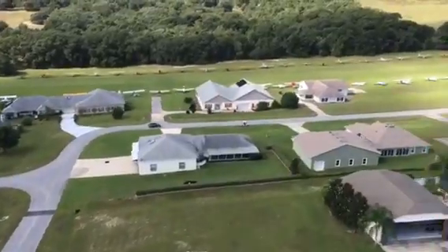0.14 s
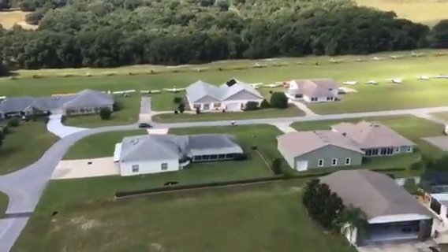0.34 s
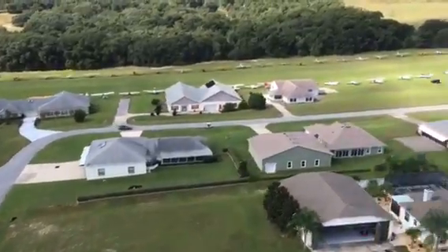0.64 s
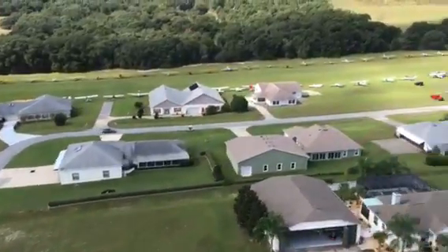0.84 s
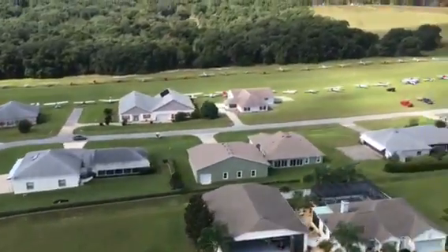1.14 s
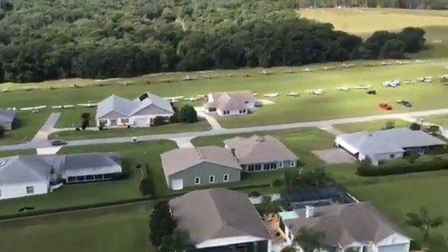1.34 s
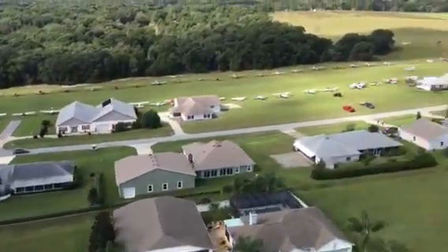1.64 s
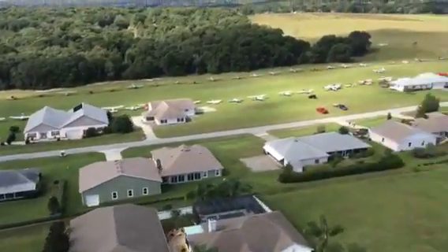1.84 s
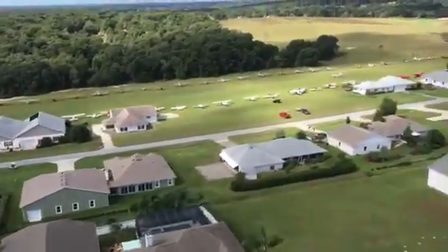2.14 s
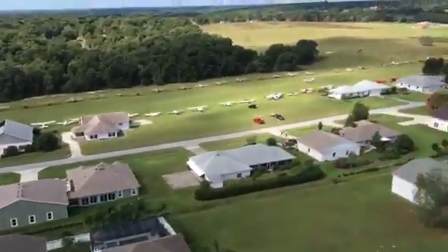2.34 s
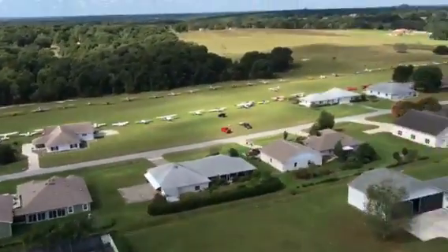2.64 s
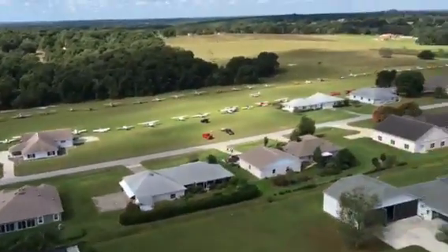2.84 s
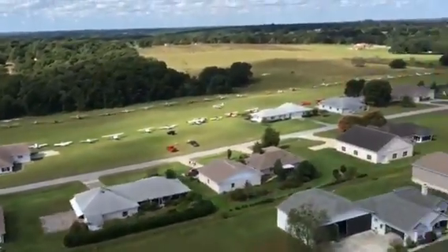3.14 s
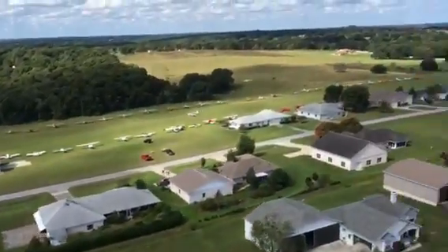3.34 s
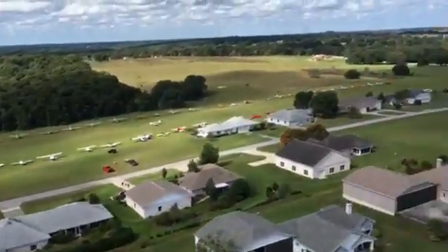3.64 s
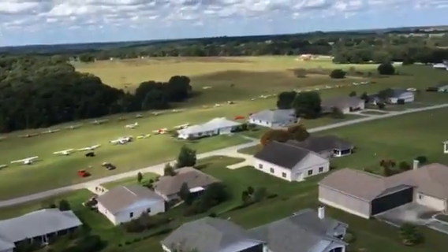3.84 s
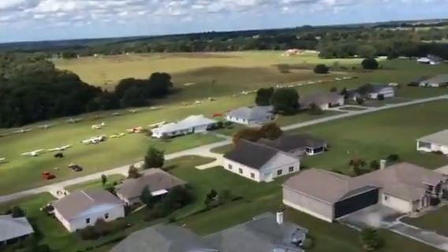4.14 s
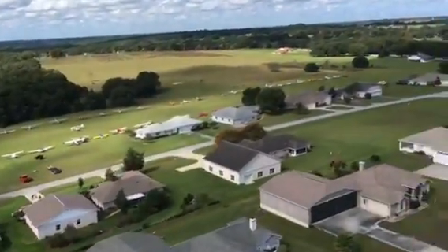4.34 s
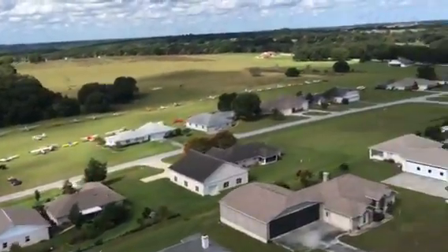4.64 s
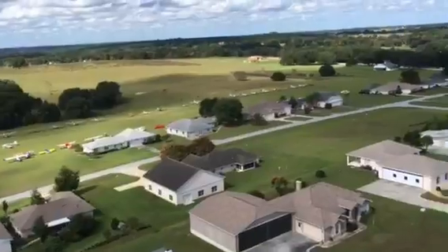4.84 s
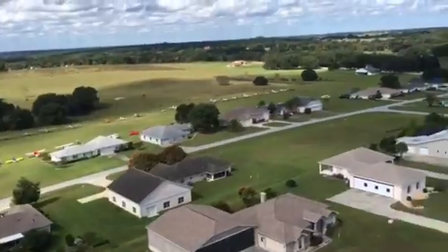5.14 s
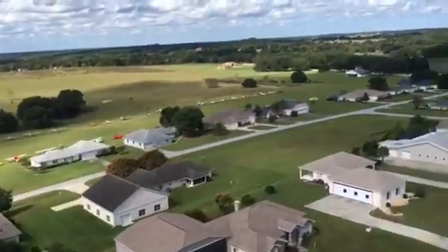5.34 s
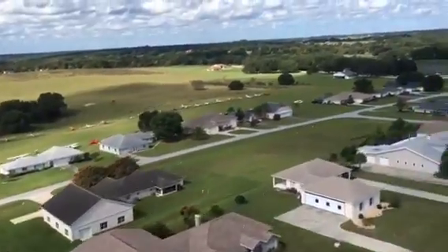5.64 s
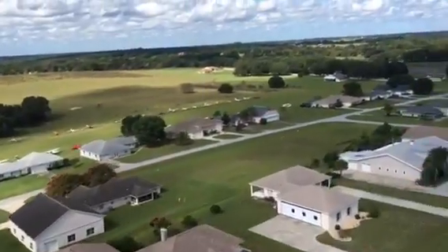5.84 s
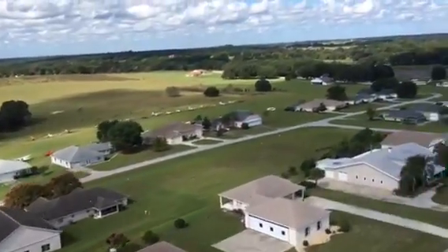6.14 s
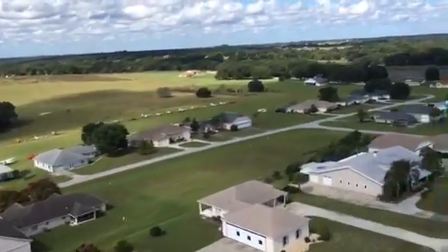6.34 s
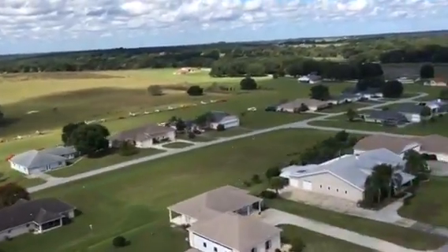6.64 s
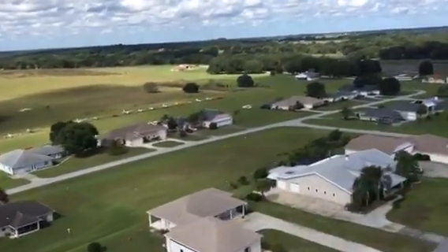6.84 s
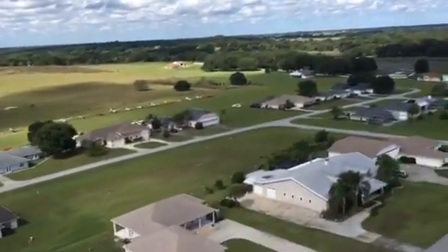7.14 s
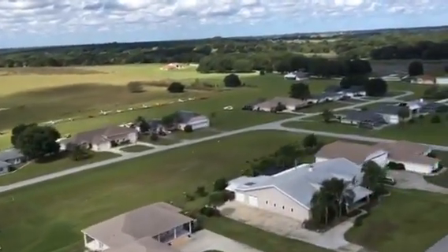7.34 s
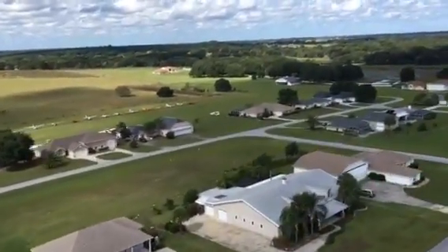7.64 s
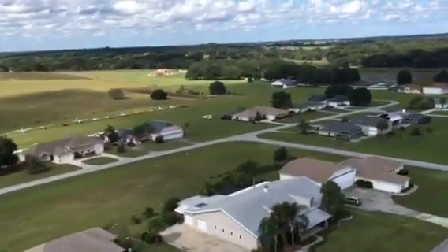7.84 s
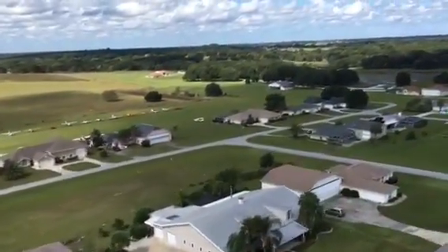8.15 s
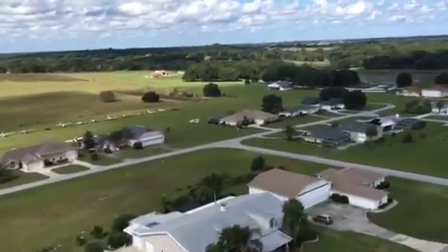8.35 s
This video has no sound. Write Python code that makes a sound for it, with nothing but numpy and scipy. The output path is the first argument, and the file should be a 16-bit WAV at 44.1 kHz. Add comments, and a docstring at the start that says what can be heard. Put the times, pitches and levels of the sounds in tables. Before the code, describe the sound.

Aboard a small open helicopter in steady flight, close and windy throughout. Rotor blades pass about 13.6 times a second, each a short sweep of bright hiss over broad rushing cabin air; this hiss swells most around 2 seconds and is slightly weaker later. Beneath, a six-cylinder piston engine holds a low, slightly wavering drone, locked to the rotor. From 0 to 3.5 seconds the wind is moderate: low lumpy buffeting, soft shoves and occasional thumps and pops. From about 3.7 crackling bursts come more often, getting brighter through 5. Around 5.2 to 6 the slipstream slams the microphone with heavy thumps, sharp cracks and a torn fluttering roar, squashed at the peaks. It dips near 6.5, surges again around 7.3, then eases with scattered thuds and crackles to 8.5, rotor and engine continuing unchanged.

```python
"""Small piston helicopter, open air

Air rushes around the cabin: shaped noise. Each rotor blade sweeps bands of hiss past, gated by its passage.
A six-cylinder engine drones beneath: sine lines geared to the rotor.
One slipstream, hardest after five seconds, shakes the microphone with narrow bands of low noise.
It crackles in short noise grains, roars and cracks; a limiter holds the peaks."""
import sys
import numpy as np
from scipy import signal
from scipy.fft import rfft, irfft, next_fast_len
from scipy.io import wavfile
from scipy.ndimage import uniform_filter1d, minimum_filter1d

SR = 44100
rng = np.random.default_rng(int(sys.argv[2]) if len(sys.argv) > 2 else 0)


def int16_out(signal):
    """Quantize to a 16-bit WAV file."""
    q = np.round(np.clip(np.atleast_2d(signal).T, -1, 1) * 32767)
    wavfile.write(sys.argv[1], SR, q.astype(np.int16))


N = 374850


def undb(db):
    """Decibels to gain."""
    return 10 ** (np.asarray(db) / 20)


def curve(table, column=1):
    """One column of a table, joined by straight lines in time."""
    rows = np.array(table, float)
    return np.interp(np.arange(N) / SR, rows[:, 0], rows[:, column])


def noise(gain):
    """Noise of rms 1 whose spectrum follows gain(Hz)."""
    size = next_fast_len(N)
    hz = np.maximum(np.arange(size // 2 + 1) * SR / size, 1)
    spectrum = rfft(rng.standard_normal(size)) * gain(hz)
    x = irfft(spectrum, size)[:N]
    return x / x.std()


def coloured(points):
    """Noise of rms 1 whose spectrum joins (Hz, dB) points."""
    hz, db = np.transpose(points)
    return noise(lambda f: undb(np.interp(np.log(f), np.log(hz), db)))


def walk(rate_hz):
    """Slow random drift of spread 1, about rate_hz turns a second."""
    return noise(lambda f: np.exp(-.5 * (f / rate_hz) ** 2))


def steadied(x, seconds):
    """Noise with its slow swells evened out, so that a curve can play its strength."""
    local_power = uniform_filter1d(x * x, max(int(seconds * SR), 2))
    return x / np.sqrt(local_power + 1e-9)


def swells(rate_hz, depth_db):
    """A gain that swells and sinks by chance, its power evened over 0.65 s."""
    return steadied(undb(depth_db * walk(rate_hz)), seconds=0.65)


def blade_gate(blades, delay, rise, fall):
    """A rounded swell, peaking delay seconds after each blade passage, with its own rise and fall."""
    period = N / SR / (blades[-1] - blades[0])
    since = (blades - delay / period) % 1 * period
    falling = np.exp(-.5 * (since / fall) ** 2)
    rising = np.exp(-.5 * ((period - since) / rise) ** 2)
    return np.maximum(falling, rising)


def bell(s, length, skew=.3):
    """Sample numbers and heights of a burst of power that rises faster than it falls."""
    length = max(abs(length), 2 / SR)
    first = max(int((s - 2 * length) * SR), 0)
    last = min(int((s + 3 * length) * SR), N)
    i = np.arange(first, last)
    u = (i / SR - s) / length
    side = 1 + np.clip(skew, 0, .7) * np.sign(u)
    return i, np.exp(-np.pi * (u / side) ** 2)


def power(times, db, lengths):
    """Power over time of a train of bursts."""
    out = np.zeros(N)
    for s, gain, length in zip(*np.broadcast_arrays(times, undb(db), lengths)):
        i, height = bell(s, length)
        out[i] += gain ** 2 * height
    return out


def grains(times, db, lengths, colour):
    """Short puffs of coloured noise, each with its own grain and a set strength."""
    source, out = coloured(colour), np.zeros(N)
    starts = rng.integers(0, N, len(times))
    for s, gain, length, start in zip(*np.broadcast_arrays(times, undb(db), lengths, starts)):
        i, height = bell(s, length)
        grain = source[(start + np.arange(len(i))) % N] * np.sqrt(height)
        # every grain carries the energy of its bell
        out[i] += gain * grain * np.sqrt(height.sum() / (grain @ grain + 1e-18))
    return out


# spectrum of the rush around the cabin: relative
# columns: pitch_hz, density_db (per Hz)
AIR_COLOUR = [(150, 2), (230, 3.5), (330, 5), (560, -12), (750, -7), (930, -4), (1500, -12.5), (2200, -13),
              (3500, -19), (6200, -25.5), (7800, -27), (9800, -26), (10500, -32), (11800, -26.5),
              (16000, -39)]


def air(level_db=-37, flicker_db=2.0):
    """Air rushes around the cabin: broad noise that flickers quickly."""
    return coloured(AIR_COLOUR) * undb(level_db + flicker_db * walk(32))


# blade swish, the highest band first; rise and fall are Gaussian spreads
# columns: centre_hz, width_hz, level_db (before scatter and hiss ride), delay_s, rise_s, fall_s
SWISH_BANDS = [(14200, 2000, -59.5, .018, .009, .015), (11420, 1460, -47, 0.0021, 0.0041, 0.0042),
               (8830, 2700, -48.5, 0.0067, 0.0083, 0.011), (6000, 2000, -55.5, 0.036, 0.025, 0.017),
               (4530, 860, -49, 0.006, 0.0079, .014), (1870, 1100, -46, 0.0054, 0.011, 0.016)]


def rotor_swish(blades, scatter_db=1.3):
    """Each blade sweeps bands of hiss past the cabin, each band with its own delay and linger."""
    out = 0
    for hz, width, db, delay, rise, fall in SWISH_BANDS:
        band = noise(lambda f: 1 / (1 + ((f * f - hz * hz) / (f * width)) ** 2 / 2))
        out = out + undb(db) * band * blade_gate(blades, delay, rise, fall)
    return out * undb(scatter_db * walk(1.4))


# ride on the air and blade hiss together
# columns: time_s, gain_db
HISS_RIDE = [(0, 2), (.8, 2.5), (2, 5.5), (2.8, 2.5), (3.7, 3.5), (4.5, -0.5), (5.5, 0.5), (6.3, -2),
             (8.5, -1.5)]


def hiss(blades):
    """Cabin air and blade swish rise and sink together."""
    return (rotor_swish(blades) + air()) * undb(curve(HISS_RIDE))


ENGINE_TURNS_PER_BLADE = 10 / 3
# engine lines; the engine fires three times a crankshaft turn
# columns: multiple (of the crankshaft rate), level_db (rms, before the waver)
ENGINE_LINES = [(1, -27.5), (1.5, -24), (2, -28), (3, -32), (6, -38.5), (7, -44), (9, -41.3), (19, -51.5),
                (19.5, -49.3)]


def engine(blades):
    """Crankshaft and firing lines, geared to the rotor; each wavers a little in the moving air."""
    angle = 2 * np.pi * blades * ENGINE_TURNS_PER_BLADE
    out = 0
    for multiple, db in ENGINE_LINES:
        order = np.round(2 * multiple) / 2  # a four-stroke cycle lasts two turns
        waver = .16 * np.sqrt(order) * walk(4)
        phase = order * angle + rng.uniform(0, 2 * np.pi) + waver
        out = out + np.sqrt(2) * undb(db + 1.5 * walk(2)) * np.sin(phase)
    return out


# eddies by size; the small ones grow fastest in a strong wind
# columns: centre_hz, level_db (at 0 dB of buffeting, before lumps and shoves), slope_db (per dB of buffeting)
EDDY_SIZES = [(47.7, -26, 0.37), (64.9, -17.5, 0.62), (93, -15, 0.94), (124.5, -17, 1.05),
              (181.4, -19.5, 1.58), (248, -25.5, 1.7)]
# strength of the buffeting
# columns: time_s, strength_db
BUFFETING_STRENGTH = [(0, -9.5), (1.1, -12.5), (3.3, -10), (4.2, -4.5), (5.05, -4), (5.7, 3.5), (6.5, -2),
                      (7.3, 0.5), (7.9, -2.5), (8.5, -2)]
# big single eddies that shove the microphone
# columns: peak_s, level_db (over the buffeting, before the trim)
EDDY_SHOVES = [(0.27, 5), (0.9, 4), (1.14, 3), (1.32, 5), (1.65, 3), (1.84, 6), (2.03, 5), (2.38, 6),
               (2.74, 4), (3.01, 4), (3.19, 5)]


def buffeting(blades, wash=0.52, width=0.18, shove_trim_db=-2, shove_s=0.077):
    """Eddies shake the microphone in lumps; the downwash of each blade adds a push."""
    push = 1 + wash * blade_gate(blades, delay=.0065, rise=0.036, fall=0.046)
    strength_db, out = curve(BUFFETING_STRENGTH), 0
    for hz, db, slope in EDDY_SIZES:
        eddy = noise(lambda f: np.exp(-.5 * (np.log(f / hz) / width) ** 2))
        out = out + undb(db + slope * strength_db) * steadied(eddy * push, seconds=.15)
    s, db = np.transpose(EDDY_SHOVES)
    shoved = np.sqrt(1.5 + power(s, db + shove_trim_db, shove_s))
    return out * shoved * swells(5.9, depth_db=3)


# flow strengths: where the crackle levels hold, and where clumps close up and the air begins to crack
BRISK_DB, TORN_DB = -23, -22.5
# spectra of thump, puff and bright edge, in that order: relative
# columns of each: pitch_hz, density_db (per Hz)
PUFF_COLOURS = [
    [(110, -48), (230, -0.5), (330, 0), (600, -4.5), (800, -14), (1800, -66)],
    [(200, -41), (700, 1), (1200, -0.5), (2000, -8), (2800, -20.5), (8000, -50)],
    [(900, -23), (2200, 1.5), (3800, -6), (5000, -13.5), (9000, -24), (16000, -37)],
]
# thump, puff and edge, in that order
# column: length_s
PUFF_LENGTHS = [.0065, .004, .0012]
# thump, puff and edge of the small bursts
# columns: level_db (in a brisk flow), slope_db (per dB of flow), scatter_db
CRACKLE_PARTS = [(-23.5, 1.06, 3), (-27, 1.02, 2.5), (-37.5, 1.55, 4.5)]


def crackle(blades, flow_db, count=1000, scatter_db=2.0, wash_db=5):
    """The many small bursts: dull in a weak flow, bright in a strong one, stronger under a blade."""
    chance = rng.uniform(-1, 1, (count, 6)).T
    s = (np.arange(count) + .5 + chance[0]) * N / SR / count
    at = np.clip((s * SR).astype(int), 0, N - 1)
    wash = blade_gate(blades, delay=0.0043, rise=0.015, fall=0.021)[at]
    size_db = scatter_db * np.sqrt(3) * chance[1] + wash_db * wash  # root 3 makes the scatter an rms
    out = 0
    for part, colour, length, own in zip(CRACKLE_PARTS, PUFF_COLOURS, PUFF_LENGTHS, chance[3:]):
        db, slope, own_db = part
        sizes = size_db + own_db * np.sqrt(3) * own
        lengths = length * 2 ** (0.707 * chance[2])
        # neighbouring bursts share out the power of the flow
        local = uniform_filter1d(undb(sizes) ** 2 * lengths, size=17) * count * SR / N
        level_db = db + slope * (flow_db[at] - BRISK_DB) + sizes - 10 * np.log10(local)
        out = out + grains(at / SR, level_db, lengths, colour)
    return out


def roar(flow_db, brisk_db=-18, growth=1.0, puff_db=-2, edge_db=-10, flutter_db=8.5):
    """In the strongest flow the bursts run together into a fluttering roar."""
    share_db = brisk_db + growth * (flow_db - BRISK_DB)
    rush = sum(undb(db) * coloured(colour) for db, colour in zip((0, puff_db, edge_db), PUFF_COLOURS))
    return rush * undb(flow_db + share_db + flutter_db * walk(280))


# the strongest bursts
# columns: peak_s, thump_db, puff_db, edge_db
STRONG_BURSTS = [(0.09, -19.5, -19, -23.5), (0.101, -21, -18, -30), (0.253, -18, -27, -37),
                 (0.664, -18, -17.5, -24), (0.77, -18, -32, -40), (0.788, -15.5, -25, -24.5),
                 (0.916, -19, -19, -33), (0.987, -18, -28, -37), (1.132, -23, -29, -38),
                 (1.557, -17.5, -26, -35), (1.786, -27, -21.5, -29), (1.843, -18, -18.5, -26),
                 (1.853, -21.5, -15, -19), (1.858, -16, -24, -28), (2.588, -14.5, -19, -21),
                 (2.887, -20, -33, -39), (3.621, -27, -27, -31), (3.747, -21, -28, -28),
                 (3.773, -20.5, -19, -16), (3.868, -31, -21, -24), (3.916, -17.5, -19, -27),
                 (3.964, -21, -21, -28), (4.052, -17, -24, -20), (4.068, -31, -23, -21),
                 (4.1, -22, -23, -30), (4.133, -16, -24, -42), (4.196, -17, -22.5, -24),
                 (4.224, -26, -22.5, -22.5), (4.313, -15, -23, -26), (4.322, -21, -20, -17),
                 (4.34, -15, -19, -20), (4.356, -28, -16, -14), (4.429, -16, -21.5, -22),
                 (4.542, -19, -19, -17), (4.6, -20, -21, -29), (4.63, -18.5, -24, -34),
                 (4.704, -14.5, -14.5, -17.5), (4.792, -25, -20, -27), (4.8, -18, -22, -31),
                 (4.826, -17, -18, -20), (4.842, -17, -23, -22), (4.854, -15, -13, -20.5),
                 (4.873, -15.5, -20.5, -19), (4.981, -15, -19, -20), (5.008, -11, -22, -24),
                 (5.045, -23, -19, -21.5), (5.078, -19, -19, -21), (5.191, -17, -18, -20),
                 (5.21, -10, -19, -21), (5.226, -13, -15, -17), (5.289, -14, -32, -18),
                 (5.429, -17, -14, -12), (5.624, -4, -12, -16), (5.767, -9, -11, -16),
                 (5.855, -8, -10, -10), (6.139, -14, -25, -20), (6.259, -16, -16, -13),
                 (6.331, -9.5, -13, -19), (6.409, -16.5, -12.5, -19.5), (6.589, -31, -17.5, -26.5),
                 (6.671, -11, -13, -20), (6.693, -15, -15, -20), (6.855, -15, -11.5, -20.5),
                 (6.885, -22, -17, -17), (6.915, -22, -16, -18), (6.959, -21, -16.5, -21),
                 (7.001, -13, -12, -21), (7.027, -23, -19, -36), (7.203, -17, -17, -19),
                 (7.235, -21, -18, -20), (7.301, -5.5, -10, -20), (7.32, -13, -15, -31),
                 (7.39, -11, -18, -15), (7.43, -14.5, -17, -15.5), (7.621, -11, -21.5, -22),
                 (7.633, -11, -15, -22), (7.647, -20, -22, -17), (7.706, -13, -18, -31),
                 (7.714, -16, -21, -24), (7.721, -15, -19, -22), (7.867, -17, -17, -20),
                 (7.928, -15, -15.5, -18), (8.008, -19, -17, -27), (8.055, -16, -20, -20),
                 (8.066, -17, -21, -29), (8.092, -18, -21.5, -20), (8.121, -27, -19, -22.5),
                 (8.206, -23, -17, -23), (8.222, -24, -24, -23), (8.243, -15.5, -22, -25),
                 (8.342, -16, -24, -29), (8.353, -14, -15.5, -18), (8.39, -19, -17, -22),
                 (8.415, -15, -11, -18), (8.462, -14, -17, -21)]


def bursts():
    """The flow breaks away for a few milliseconds: a low thump, a dull puff and a shorter, bright edge."""
    s, *levels = np.transpose(STRONG_BURSTS)
    parts = zip(levels, PUFF_LENGTHS, PUFF_COLOURS)
    return sum(grains(s, db, length, colour) for db, length, colour in parts)


def gusty(flow_db, gust_db=-16.5, gust_s=0.016, lag_s=0.01):
    """The flow with a short gust trailing each strong burst, set against the level of its puff."""
    s, _, puff_db, _ = np.transpose(STRONG_BURSTS)
    return 10 * np.log10(undb(flow_db) ** 2 + power(s + lag_s, puff_db + gust_db, gust_s))


# the loudest pressure jumps that crack
# columns: peak_s, level_db (before gain_db)
LOUD_CRACKS = [(4.357, -24), (4.703, -26), (5.246, -22), (5.29, -19), (5.355, -23), (5.422, -23),
               (5.521, -24), (5.541, -23), (5.748, -16), (5.765, -23)]
# spectrum of a crack: relative
# columns: pitch_hz, density_db (per Hz)
CRACK_SPECTRUM = [(500, -3), (3500, 0), (6500, -5), (9000, -12), (16000, -32)]


def cracks(flow_db, count=420, below_db=-18, scatter_db=6, length_s=0.00034, gain_db=10.5):
    """Pressure jumps shorter than a millisecond reach far into the treble; a torn flow scatters weaker ones."""
    chance = rng.uniform(0, 1, (count, 2)).T
    at = ((np.arange(count) + chance[0]) * (N - 1) / count).astype(int)
    db = flow_db[at] + below_db + scatter_db * (2 * chance[1] - 1)
    torn = flow_db[at] > TORN_DB
    loud = power(*np.transpose(LOUD_CRACKS), length_s)
    weak = power(at[torn] / SR, db[torn], length_s)
    return undb(gain_db) * np.sqrt(loud + weak) * steadied(coloured(CRACK_SPECTRUM), seconds=length_s)


# slipstream at the microphone
# columns: time_s, strength_db (before clumps and gusts)
SLIPSTREAM = [(0.0, -35.5), (0.45, -36), (0.75, -31), (1.4, -36.5), (2.2, -34.5), (3.55, -39), (4.15, -31),
              (4.7, -30.5), (5.18, -25.5), (5.25, -20), (5.85, -15.5), (6.5, -26), (6.7, -24),
              (7.33, -21.5), (7.8, -29), (8.15, -26.5), (8.5, -38)]


def slipstream(blades, closing_db=7):
    """Crackle and roar, in clumps until the flow is fully torn, with the strongest bursts and the cracks."""
    mean_db = curve(SLIPSTREAM)
    patchy = np.clip((TORN_DB - mean_db) / closing_db, 0, 1)
    clumps_db = 20 * np.log10(swells(11.6, depth_db=2))
    flow_db = gusty(mean_db + patchy * clumps_db)
    return crackle(blades, flow_db) + roar(flow_db) + bursts() + cracks(mean_db)


FIRST_BLADE_S = .0785
# main rotor speed
# columns: time_s, passages_hz (blades per second)
ROTOR_SPEED = [(0, 13.61), (3.6, 13.61), (5.2, 13.64), (6.5, 13.6), (7.2, 13.54), (8.5, 13.55)]


def scene():
    """Hiss, engine, buffeting and slipstream, tied together by the count of passing blades."""
    blades = np.cumsum(curve(ROTOR_SPEED)) / SR - FIRST_BLADE_S * ROTOR_SPEED[0][1]
    return (hiss(blades) + engine(blades) + buffeting(blades) + slipstream(blades))[None]


def limiter(x, ceiling, size):
    """Gain that dips smoothly around every peak over the ceiling; size is in samples."""
    gain = minimum_filter1d(ceiling / np.maximum(np.abs(x), ceiling), size)
    return x * uniform_filter1d(gain, size)


def record(dry):
    """The recorder drops the deepest rumble, limits the gusts and cuts the top."""
    low_cut = signal.butter(4, 33, "high", fs=SR, output="sos")
    top_cut = signal.ellip(10, .1, 70, 15750, fs=SR, output="sos")
    held = limiter(signal.sosfilt(low_cut, dry), ceiling=.71, size=151)
    return signal.sosfilt(top_cut, held)


dry = scene()
out = record(dry)
int16_out(out)
```